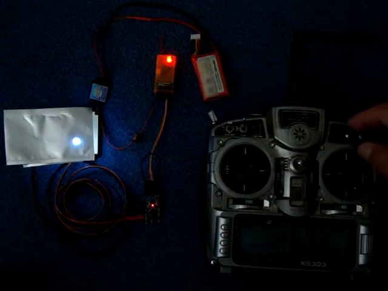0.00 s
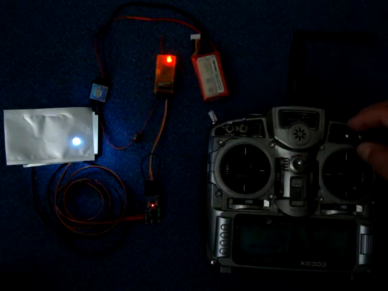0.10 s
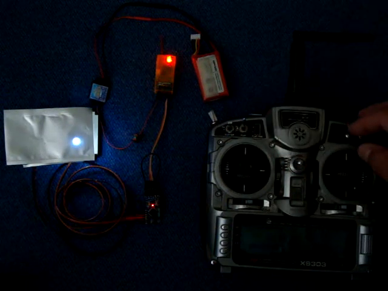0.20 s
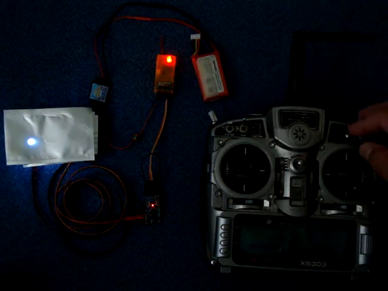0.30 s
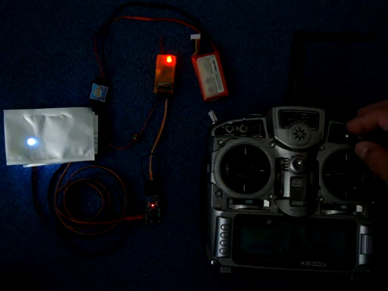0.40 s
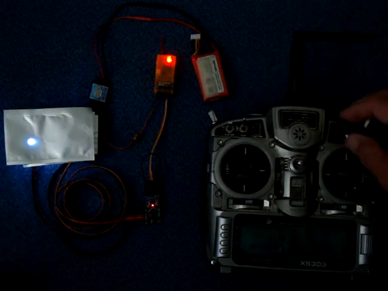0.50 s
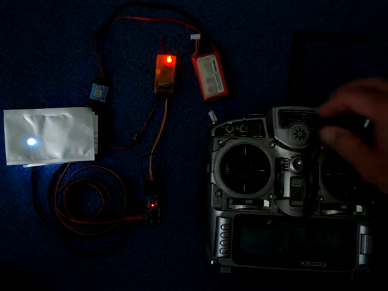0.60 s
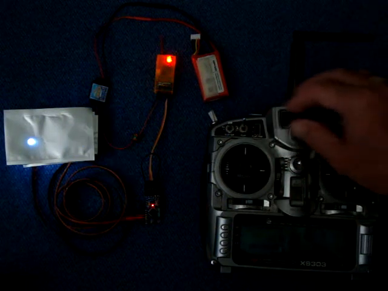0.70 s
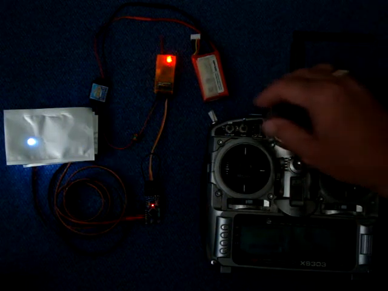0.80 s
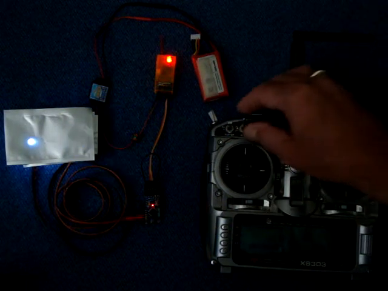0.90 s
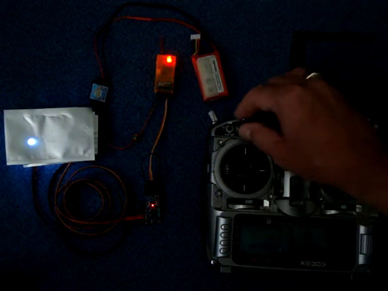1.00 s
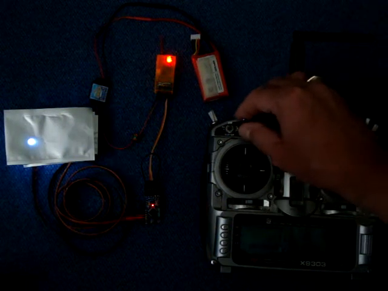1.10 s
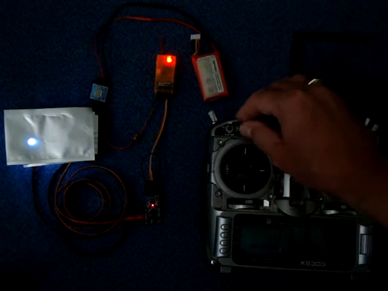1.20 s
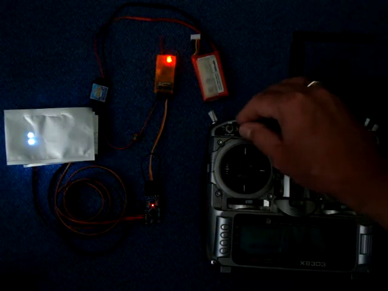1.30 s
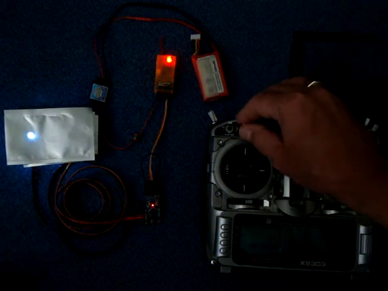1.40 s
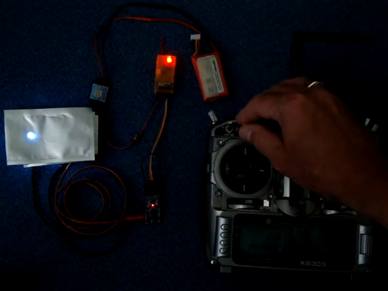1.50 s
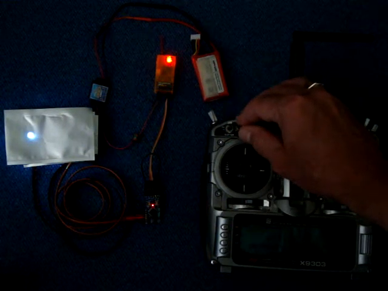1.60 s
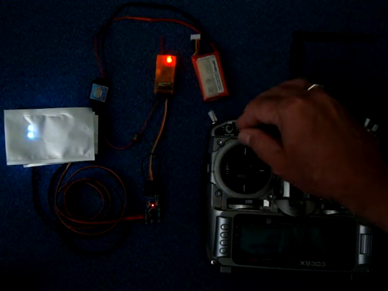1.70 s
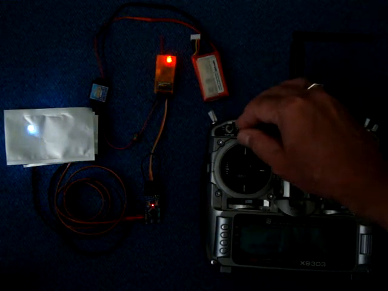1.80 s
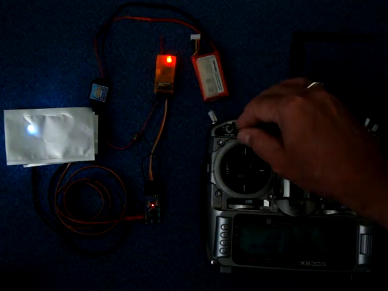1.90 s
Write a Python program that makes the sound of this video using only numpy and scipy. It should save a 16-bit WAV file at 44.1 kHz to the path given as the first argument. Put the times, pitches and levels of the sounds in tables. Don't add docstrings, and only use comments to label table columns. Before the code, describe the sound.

A hand flicks switches on a hollow plastic controller: a hard snap, a pause with faint ticks, then a lighter click and the strongest snap soon after, recorded close indoors with soft microphone hiss.

```python
import sys
import numpy as np
from scipy import signal
from scipy.fft import rfft, irfft
from scipy.io import wavfile

SR = 44100
rng = np.random.default_rng(int(sys.argv[2]) if len(sys.argv) > 2 else 0)


def generate_wav(sig):
    pcm = np.round(np.clip(np.atleast_2d(sig).T, -1, 1) * 32767).astype(np.int16)
    wavfile.write(sys.argv[1], SR, pcm)


def voltage_ratio(decibels):
    exponent = np.asarray(decibels, float) / 20
    return 10 ** exponent


N = 85995

# f/Hz, level/dB, t60/s
CASE_MODES_A = [(786, -9, .03), (909, -0.5, 0.022), (1146, 6.5, 0.034), (1220, 5, 0.011),
                (1293, 0.5, 0.031), (1500, -2.5, 0.024), (1770, -4.5, .012), (2065, -1, .012),
                (2830, -1, 0.01), (3600, 2.5, .009), (4506, -1.5, 0.026), (5530, -27, .008),
                (6800, -21, .008), (9000, -32, .008)]
CASE_MODES_B = [(863, -5.5, 0.019), (950, -6, 0.022), (1123, -9.5, 0.033), (1238, -0.5, .02),
                (1823, -10.5, 0.031), (2300, -8, 0.0081), (2650, -7.5, .015), (3010, -1, 0.013),
                (3500, -25, 0.007), (3980, -0.5, .015), (5700, 3.5, 0.011), (6530, -31, .012),
                (7600, -14, .012), (9400, -17, 0.017)]
CASE_MODES_C = [(602, -8, 0.052), (845, -3, 0.045), (914, -6, 0.029), (1129, 2.5, 0.014), (1460, -6, .012),
                (1714, -7, 0.023), (1781, -9, 0.025), (2300, -26, 0.011), (2880, -8.5, 0.0086),
                (3690, -2.5, 0.013), (4500, -8.5, 0.0091), (5400, -20, .008), (7000, -32, .008),
                (9300, -34, .008)]
# t/s, level/dB, hardness as cut-off f/Hz, chatter length/s
CONTACTS_A = [
    (.2198, -20.5, 6000, 0.0037),
    (.2238, -20.5, 1500, 0.0017),
    (.2275, -28.5, 5000, 0.0013),
    (.2335, -44, 6000, 0.0078),
]
CONTACTS_B = [
    (1.2588, -27.5, 9000, 0.0045),
    (1.2618, -25, 3500, 0.0037),
    (1.2675, -34.5, 6100, 0.002),
]
CONTACTS_C = [
    (1.6434, -15, 4500, 0.0039),
    (1.6468, -20.5, 2500, 0.01),
    (1.6495, -24, 5000, 0.0068),
    (1.659, -57, 4040, 0.0024),
]
# t/s, level/dB, f/Hz, t60/s
LEVER_CRACKS = [
    (0.2199, -7, 2690, 0.0028),
    (1.2587, -33.5, 9750, 0.0087),
    (1.2597, -30.5, 3500, 0.013),
    (1.6433, -12, 2140, 0.0032),
]
# peak t/s, level/dB, centre f/Hz, width/Hz
SPRING_RASPS = [
    (0.2181, -27.5, 7000, 2500),
    (1.259, -34.5, 7000, 5160),
    (1.6424, -29, 6940, 5400),
]
# t/s, peak level/dB, t60/s
LEVER_RATTLES = [
    (0.222, -35, 0.073),
    (1.2603, -32, 0.063),
    (1.6447, -28.5, 0.064),
]
# t/s, level/dB, f/Hz, t60/s
TABLE_KNOCKS = [
    (.222, -44.5, 370, 0.074),
    (1.263, -52.5, 313, 0.25),
    (1.646, -46.5, 386, 0.044),
]
# t/s, level/dB, f/Hz, t60/s
FAINT_TICKS = [(.0858, -45.5, 950, 0.016), (.6535, -39, 2510, 0.0098), (.6537, -45, 4800, 0.011),
               (.6536, -46.5, 6800, .004), (.6536, -45, 3700, .004), (.6705, -64, 2770, 0.0071),
               (.6705, -46, 6400, .006), (.687, -50, 4850, 0.014), (1.4205, -50, 2630, 0.017),
               (1.4205, -49, 6450, 0.012), (1.437, -49, 2300, 0.014), (1.437, -44, 4660, 0.0048),
               (1.437, -53, 6450, 0.0066), (1.454, -50, 2570, 0.01)]
# f/Hz, t60/s
ROOM_DECAY = [(300, 0.27), (800, 0.29), (2000, 0.28), (5500, 0.2), (10000, 0.12)]
# f/Hz, level/dB per Hz
HISS_COLOUR = [(15, -63.5), (25, -24.5), (251, -3.5), (365, -2.5), (425, -2), (948, -4.5), (1600, -8.5),
               (4160, -11), (10000, -14.5), (13000, -52), (22000, -120)]
# start t/s, end t/s, low edge f/Hz, high edge f/Hz (if a band)
TREBLE_DROPOUTS = [(.1845, .2145, 2200), (.234, .241, 7500, 8500), (.2365, .245, 5700, 8200),
                   (.242, .2545, 5500), (.244, .2545, 4000), (.246, .2545, 2800), (1.2295, 1.248, 1750),
                   (1.244, 1.2525, 2600), (1.249, 1.256, 4300), (1.274, 1.283, 9300),
                   (1.276, 1.291, 6900, 8100), (1.281, 1.291, 7400, 8400), (1.2875, 1.2995, 6200),
                   (1.6245, 1.6385, 850), (1.655, 1.6595, 4800), (1.647, 1.654, 9700)]

CASE_LOW_HZ, SCATTER_DB = 600, 2.0
MAX_CYCLES, TUNED_HZ = 24, 1200
RASP_RISE_S, RASP_FALL_S = 0.00093, 0.0013
RATTLE_PER_S, RATTLE_LOW_HZ, RATTLE_HIGH_HZ = 730, 2780, 8900
ROOM_DB, ROOM_ONSET_S, ROOM_SWELL_S = -11.5, 0.002, 0.0063
HISS_DB, HISS_TOP_HZ = -57, 11000
DROP_FADE_S = 0.003
HOLE_SHARE, HOLE_FROM_HZ = 0.075, 3500
CUTOFF_HZ = 10724


def rms_one(x):
    return x / np.sqrt(np.mean(x ** 2) + 1e-20)


def at_hz(points, hz):
    table_hz, value = np.array(points).T
    return np.interp(np.log(hz), np.log(table_hz), value)


def ring(clicks, hz, t60):
    r = voltage_ratio(-60 / (t60 * SR))
    w = 2 * np.pi * hz / SR
    return signal.lfilter([0, np.sin(w)], [1, -2 * r * np.cos(w), r * r], clicks + 1e-18)


def click(s, db):
    x = np.zeros(N)
    x[int(s * SR)] = voltage_ratio(db)
    return x


def band(x, low_hz, high_hz):
    edges = [low_hz, min(high_hz, .45 * SR)]
    return signal.sosfilt(signal.butter(2, edges, "band", fs=SR, output="sos"), x)


def throw(contacts, modes):
    out = np.zeros(N)
    chance = rng.standard_normal((8, 14))
    chatter = rng.standard_normal((8, 14, 500))
    t = np.arange(500) / SR
    for row, grains, (s, db, cut_hz, length) in zip(chance, chatter, contacts):
        start = int(s * SR)
        softness_shape = t * np.exp(-4 * t / length)
        for c, grain, (hz, mode_db, t60) in zip(row, grains, modes):
            tuned = TUNED_HZ / hz * np.sin(2 * np.pi * hz * t + 9 * c)
            burst = (grain + tuned) * softness_shape
            energy = np.sum(burst ** 2)
            drive = np.abs(np.sum(burst * np.exp(2j * np.pi * hz * t)))
            hit = np.zeros(N)
            hit[start:start + 500] = burst / np.sqrt(energy + drive ** 2)
            level = voltage_ratio(db + mode_db + SCATTER_DB * c) / np.sqrt(1 + (hz / cut_hz) ** 4)
            out += ring(hit, hz, min(t60, MAX_CYCLES / hz)) * level
    return out


def cracks():
    return sum(band(ring(click(s, db), hz, t60), hz / 1.4, hz * 1.4) for s, db, hz, t60 in LEVER_CRACKS)


def rasps():
    t = np.arange(N) / SR
    out = np.zeros(N)
    for s, db, hz, width_hz in SPRING_RASPS:
        shape = np.exp(np.minimum((t - s) / RASP_RISE_S, (s - t) / RASP_FALL_S))
        scrape = band(rng.standard_normal(N), hz - width_hz / 2, hz + width_hz / 2)
        out += voltage_ratio(db) * shape * rms_one(scrape)
    return out


def rattles():
    t = np.arange(N) / SR
    grains = (rng.random(N) < RATTLE_PER_S / SR) * rng.standard_normal(N)
    shape = np.zeros(N)
    for s, db, t60 in LEVER_RATTLES:
        shape += (t > s) * voltage_ratio(db - 60 * np.maximum(t - s, 0) / t60)
    return band(rms_one(grains) * shape, RATTLE_LOW_HZ, RATTLE_HIGH_HZ)


def knocks():
    return sum(band(ring(click(s, db), hz, t60), hz / 3.0, hz * 2.3) for s, db, hz, t60 in TABLE_KNOCKS)


def ticks():
    return sum(ring(click(s, db), hz, t60) for s, db, hz, t60 in FAINT_TICKS)


def room(x):
    t = np.arange(SR // 2) / SR
    edges = 200 * 2 ** np.arange(0, 6.1, .5)
    tail = np.zeros(len(t))
    for low, high in zip(edges, edges[1:]):
        decay = voltage_ratio(-60 * t / at_hz(ROOM_DECAY, np.sqrt(low * high)))
        tail += band(rng.standard_normal(len(t)), low, high) * decay
    tail *= 1 - np.exp(-np.maximum(t - ROOM_ONSET_S, 0) / ROOM_SWELL_S)
    return signal.fftconvolve(x, tail / np.sqrt(np.sum(tail ** 2)))[:N]


def hiss():
    hz = np.maximum(np.fft.rfftfreq(N, 1 / SR), 10)
    colour = voltage_ratio(at_hz(HISS_COLOUR, hz)) * (hz < HISS_TOP_HZ)
    return voltage_ratio(HISS_DB) * rms_one(irfft(rfft(rng.standard_normal(N)) * colour, N))


def scene():
    throws = throw(CONTACTS_A, CASE_MODES_A) + throw(CONTACTS_B, CASE_MODES_B) + throw(CONTACTS_C, CASE_MODES_C)
    switches = throws + cracks() + rasps() + rattles() + ticks()
    small_case = signal.butter(5, CASE_LOW_HZ, "high", fs=SR, output="sos")
    close = signal.sosfilt(small_case, switches) + knocks()
    return (close + voltage_ratio(ROOM_DB) * room(close) + hiss())[None]


def dropouts(x):
    t = np.arange(N) / SR
    for start, end, *hz in TREBLE_DROPOUTS:
        gate = np.clip(np.minimum(t - start, end - t) / DROP_FADE_S + .5, 0, 1)
        if len(hz) == 1:
            lost = signal.butter(10, hz[0], "high", fs=SR, output="sos")
        else:
            lost = signal.butter(5, hz, "band", fs=SR, output="sos")
        x = x - np.sin(gate * np.pi / 2) ** 2 * signal.sosfiltfilt(lost, x)
    return x


def holes(x):
    hz, t, z = signal.stft(x, SR, nperseg=256)
    patches = rng.random((43, len(t) // 4 + 1))
    field = np.kron(patches, np.ones((3, 4)))[:, :len(t)]
    empty = field < HOLE_SHARE * np.clip(hz[:, None] / HOLE_FROM_HZ - 1, 0, 1)
    return signal.istft(z * ~empty, SR, nperseg=256)[1][:N]


def top_cut(x):
    return signal.sosfilt(signal.butter(12, 11120, fs=SR, output="sos"), x)


def record(dry):
    gapped = holes(dropouts(dry[0]))
    limit = signal.cheby2(16, 55, CUTOFF_HZ, fs=SR, output="sos")
    mix = signal.sosfilt(limit, gapped)[None]
    return top_cut(mix)


dry = scene()
out = record(dry)
generate_wav(out)
```